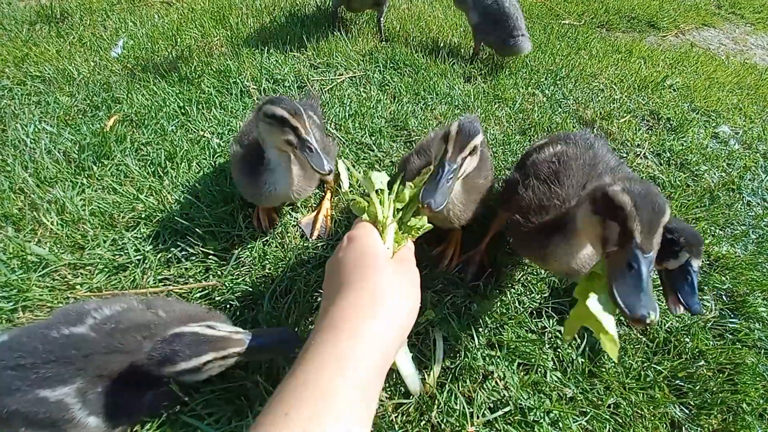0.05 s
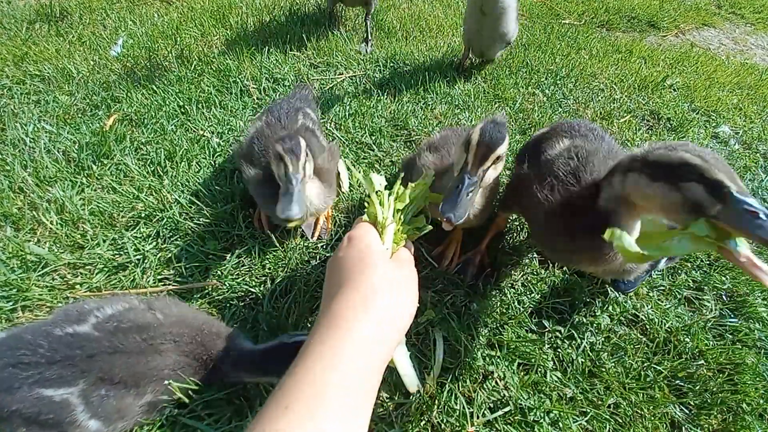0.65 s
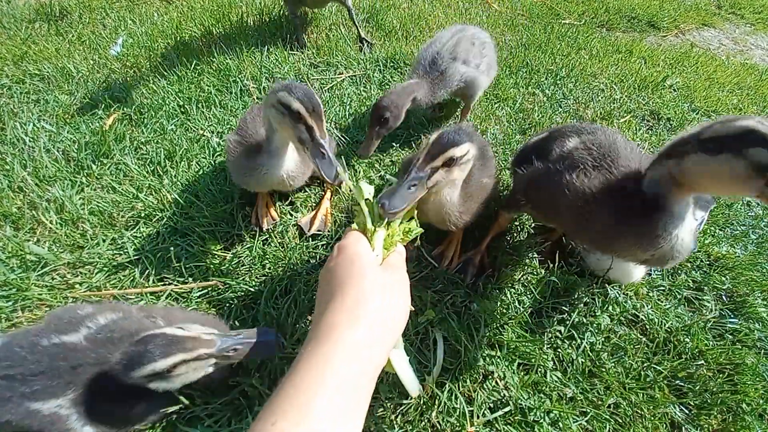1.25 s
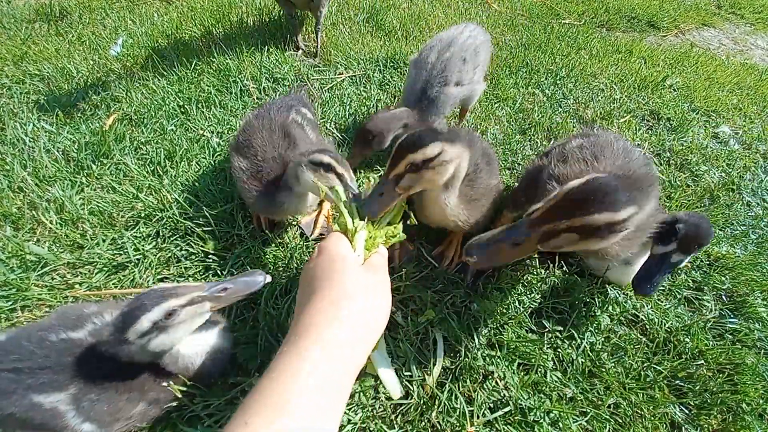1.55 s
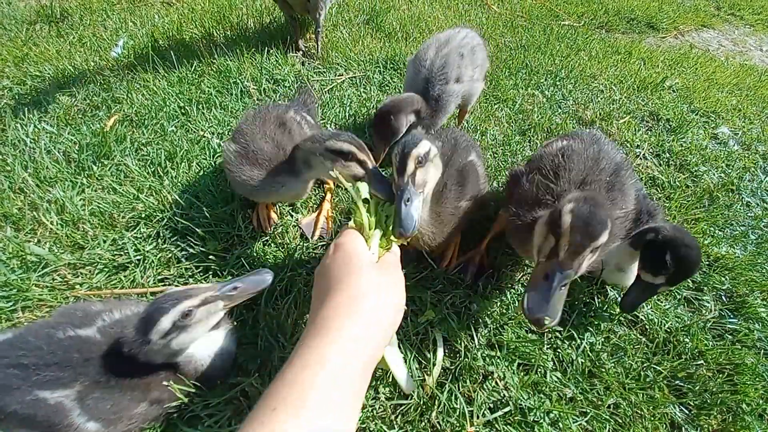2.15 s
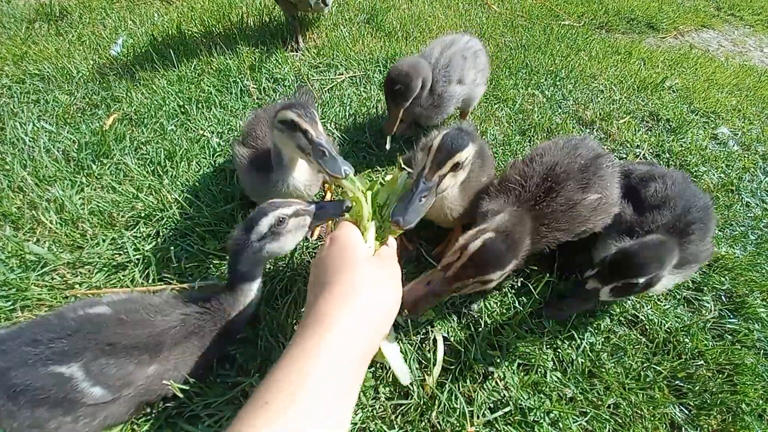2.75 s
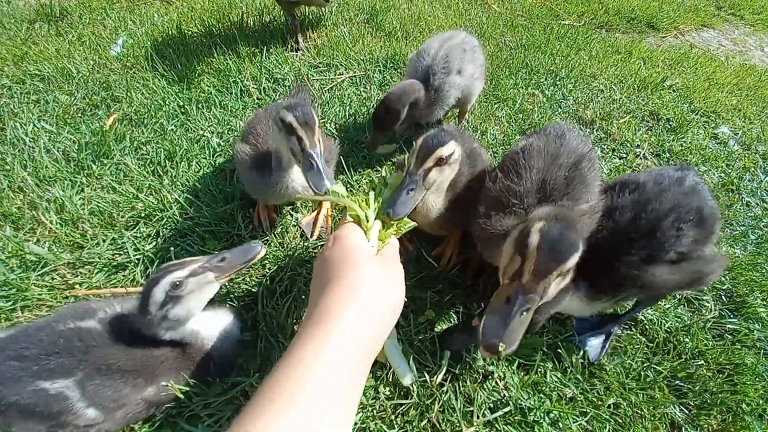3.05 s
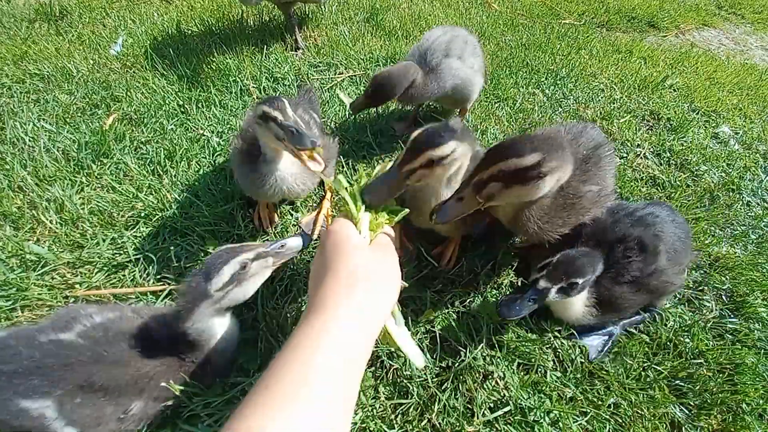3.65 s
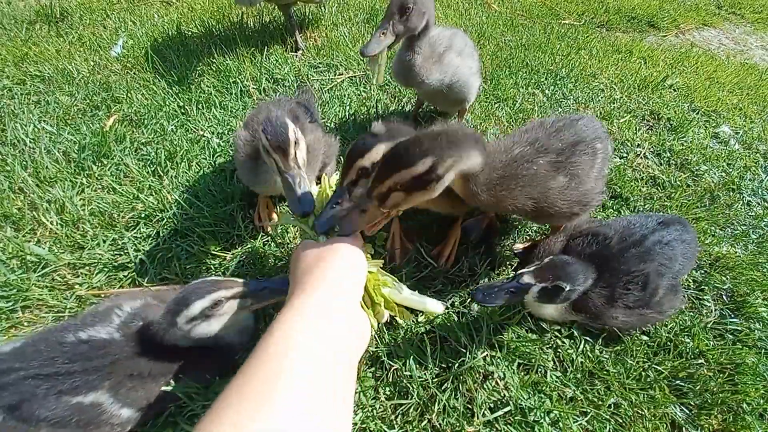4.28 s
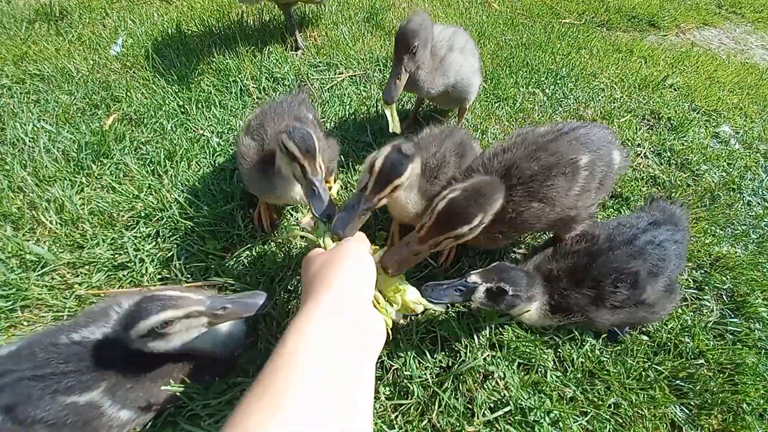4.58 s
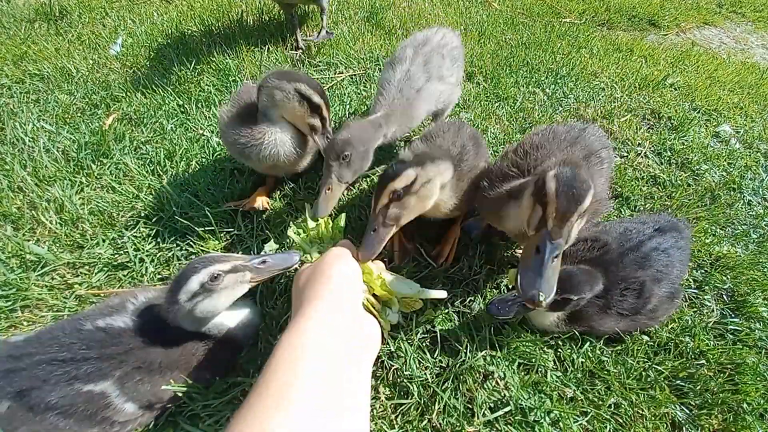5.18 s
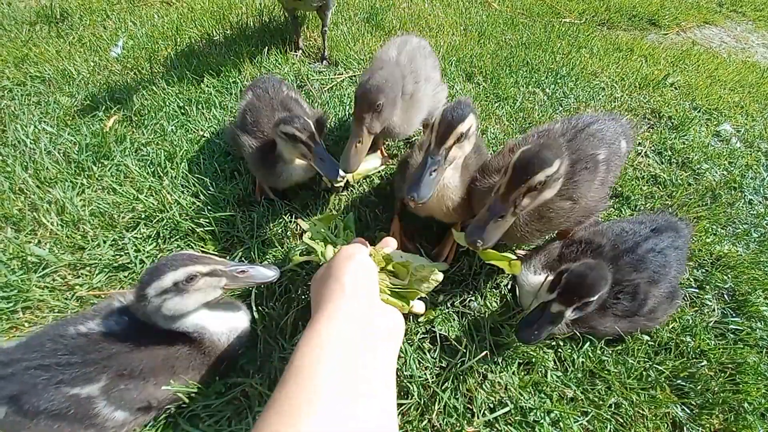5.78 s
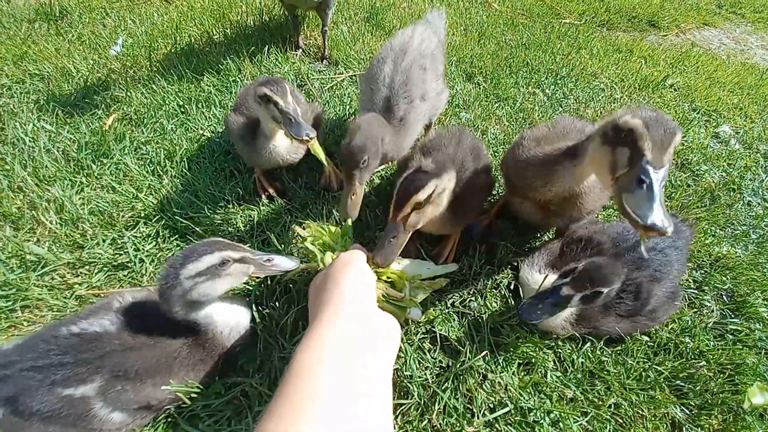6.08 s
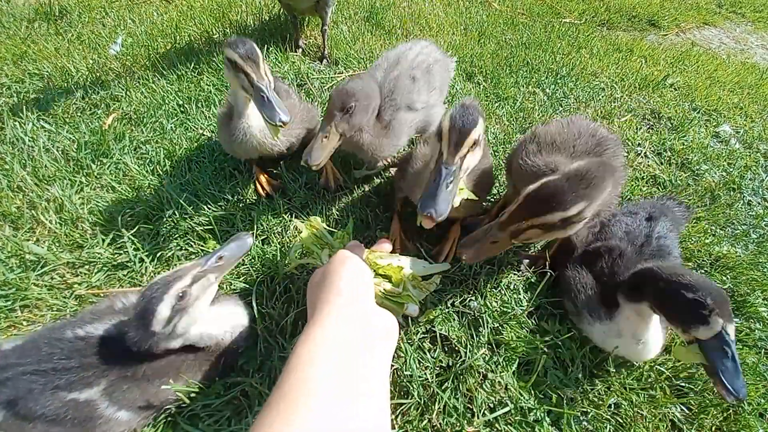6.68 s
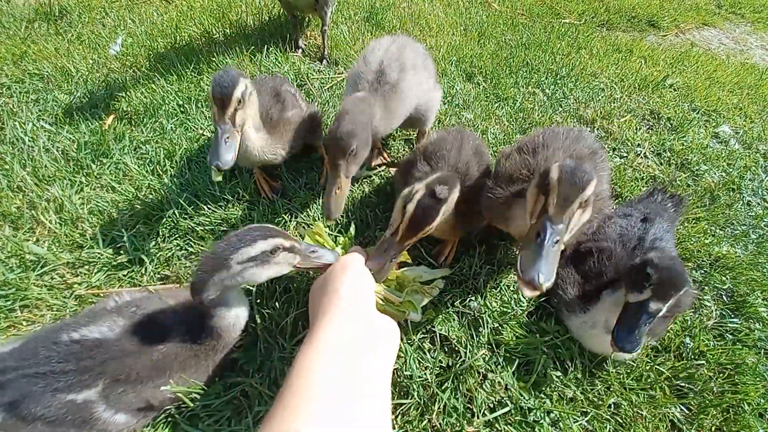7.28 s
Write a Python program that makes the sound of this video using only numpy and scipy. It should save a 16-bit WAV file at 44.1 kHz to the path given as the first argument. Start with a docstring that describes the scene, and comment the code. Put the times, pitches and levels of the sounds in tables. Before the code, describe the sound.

Young ducklings feed on lettuce on a lawn, close to the microphone. Soft grass rustle, crackling leaves and small bill snaps run throughout, with occasional faint, hoarse grunts. At about 0.3 to 0.5 seconds an older duckling gives low whistles that crack into short quacks. Smaller ducklings peep briefly from either side, clearest around 1.5 seconds, and two low whistles follow just after 2 seconds. From about 3.3 to 5.5 seconds a light breeze buffets the microphone with a low rumble, joined by a few soft thumps. Sharp pecks come near 3.9 and 4.7 seconds, and crisp leaf ribs crack between 4.5 and 6.3 seconds. The older duckling whistles and quacks again around 5.3 and 6.2 seconds, with a bright peep between. More peeps follow, and a quick cluster of bill snaps comes at about 7.4 seconds.

```python
"""Ducklings call over a handful of lettuce on a lawn: the small ones peep, and an older one, its voice
breaking, whistles low and cracks into quacks. Peeps and whistles are gliding tones of the syrinx;
quacks and soft grunts are pulses ringing in the throat. Bills snap, leaves crackle and tear, and
the grass rustles. A light breeze buffets the two microphone ports of a camera close by."""
import sys
import numpy as np
from scipy import signal
from scipy.fft import rfft, irfft, next_fast_len
from scipy.io import wavfile
from scipy.ndimage import uniform_filter1d, map_coordinates

SR = 44100
rng = np.random.default_rng(int(sys.argv[2]) if len(sys.argv) > 2 else 0)


def inscribe(sig):
    """Save sig as 16-bit PCM at rate SR to the path in sys.argv[1].

    A 1-D sig is mono; a 2-D sig holds one channel per row.
    Samples are clipped to [-1, 1] before scaling.
    """
    pcm = np.round(np.clip(np.atleast_2d(sig).T, -1, 1) * 32767)
    wavfile.write(sys.argv[1], SR, pcm.astype(np.int16))


N = 331975


def amp(db):
    return 10 ** (np.asarray(db) / 20)


def unit_rms(x):
    return x / np.sqrt(np.mean(x ** 2) + 1e-20)


def seconds(length_s):
    return np.arange(max(round(length_s * SR), 256)) / SR


def at_hz(points, hz):
    """Interpolate (hz, value) points on a log axis."""
    knots_hz, values = np.transpose(points)
    return np.interp(np.log(hz + 1), np.log(knots_hz + 1), values)


def at_time(points, t):
    """Interpolate (time_s, value) points."""
    return np.interp(t, *np.transpose(points))


def envelope(t, attack_s, release_s):
    """Swell, hold, fade."""
    swell = np.sin(np.pi / 2 * np.clip(t / attack_s, 0, 1))
    fade = np.sin(np.pi / 2 * np.clip((t[-1] - t) / release_s, 0, 1)) ** 2
    return swell * fade


def wobble(knots_per_s, n):
    """Smooth random curve of n samples."""
    knots = rng.standard_normal(int(n * knots_per_s / SR) + 4)
    return map_coordinates(knots, [np.arange(n) * knots_per_s / SR])


def filtered(x, response):
    """Apply a complex frequency response."""
    n = x.shape[-1]
    size = next_fast_len(n + 4096, True)
    return irfft(rfft(x, size) * response(np.fft.rfftfreq(size, 1 / SR)), size)[..., :n]


def coloured(x, spectrum):
    """Apply (hz, gain_db) points; rms 1."""
    return unit_rms(filtered(x, lambda hz: amp(at_hz(spectrum, hz))))


def ringing(gain_db, size=2048):
    """Minimum-phase impulse response of a gain curve; energy 1."""
    cepstrum = irfft(np.log(amp(gain_db(np.fft.rfftfreq(size, 1 / SR)))))
    cepstrum[1:size // 2] *= 2
    cepstrum[size // 2 + 1:] = 0
    impulse = irfft(np.exp(rfft(cepstrum)))
    return impulse / np.linalg.norm(impulse)


def ports(x, lead_ms, pan_db=0):
    """Mono to two ports; positive values make the left earlier and louder."""
    side = np.array([[.5], [-.5]])
    return amp(side * pan_db) * filtered(x, lambda hz: np.exp(2j * np.pi * hz * side * lead_ms / 1000))


def add(out, start_s, x):
    i = min(max(round(start_s * SR), 0), N)
    out[..., i:i + x.shape[-1]] += x[..., :N - i]


# Open-air spectrum: freq_hz, gain_db
AIR_SPECTRUM = [(18, -43.5), (30, -23), (355, 3), (780, -9), (1190, -1), (2230, -5.5), (12300, -9),
                (16000, -6.5)]


def open_air(level_db=-64):
    """Quiet, steady outdoor noise."""
    return amp(level_db) * coloured(rng.standard_normal((2, N)), AIR_SPECTRUM)


# Gust strength: time_s, relative_db
GUSTS = [(0.0, -49.5), (0.48, -58), (0.58, -35.5), (0.65, -56.5), (0.96, -87), (2.01, -82.5), (2.22, -63),
         (2.42, -63.5), (2.68, -77.5), (3.19, -79), (3.28, -53), (3.62, -47), (3.81, -57), (3.87, -43),
         (4.09, -53.5), (4.23, -47.5), (4.37, -57), (4.45, -42.5), (4.75, -38.5), (5.05, -41),
         (5.145, -42.5), (5.23, -41.5), (5.29, -50), (5.33, -38), (5.45, -38.5), (5.53, -58.5),
         (5.72, -50.5), (6.18, -59), (6.41, -72), (7.53, -54)]
# Single buffets: centre_s, eddy_db
BUFFETS = [(.065, -51), (.18, -65.5), (.25, -61.5), (3.384, -51), (3.461, -50), (3.55, -52), (3.71, -54.5),
           (3.911, -44.5), (4.185, -50.5), (4.251, -42), (4.295, -39.5), (4.42, -44.5), (4.48, -38.5),
           (4.531, -36.5), (4.595, -42), (4.66, -38), (4.757, -36.5), (4.846, -38.5), (4.915, -44),
           (5.057, -38), (5.224, -40.5), (5.461, -41.5)]
# Wind rumble spectrum: freq_hz, gain_db
RUMBLE_SPECTRUM = [(12, -57), (32, -13), (92, 7.5), (189, -5), (300, -28), (660, -100)]
# Eddy spectrum: freq_hz, gain_db
EDDY_SPECTRUM = [(90, -40), (170, -2.5), (300, 3), (500, -2.5), (800, -21), (1400, -43), (2500, -48)]


def breeze(buffet_s=.044, push_db=5, eddy_db=-9, lumpy_db=3.5, shared=.42):
    """Gusts hit each port mostly on its own; each buffet lifts the rumble and sheds finer eddies."""
    def flow(spectrum, depth_db):
        noise = rng.standard_normal((2, N)) + shared * rng.standard_normal(N)
        return coloured(noise * amp(depth_db * wobble(45, N)), spectrum)

    gust_db = at_time(GUSTS, np.arange(N) / SR)
    push, puffs = np.zeros(N), np.zeros(N)
    shape = np.hanning(round(buffet_s * SR))
    for centre_s, puff_db in BUFFETS:
        add(push, centre_s - buffet_s / 2, shape)
        add(puffs, centre_s - buffet_s / 2, amp(puff_db) * shape)
    right_bias = amp([[-2.5], [2.5]])
    rumble = amp(gust_db + push_db * push) * flow(RUMBLE_SPECTRUM, lumpy_db) * right_bias
    eddies = amp(gust_db + eddy_db) * flow(EDDY_SPECTRUM, lumpy_db)
    return rumble + eddies + puffs * flow(EDDY_SPECTRUM, 0)


# Low thumps and one peep's hum: centre_s, pitch_hz, width_s, level_db
THUMPS_AND_HUM = [(0.591, 136.4, 0.0019, -27), (3.865, 84.5, 0.0068, -36.5), (3.923, 98, 0.0041, -29),
                  (4.702, 194, 0.0017, -24), (4.767, 96.5, 0.0096, -25), (6.274, 388, 0.0027, -32),
                  (7.37, 365, 0.0014, -39.5), (7.447, 137, 0.0018, -38)]


def thumps_and_hum():
    """Short low thumps, plus the brief low hum of a duckling's fluttering peep at 6.27 s."""
    out, t = np.zeros(N), np.arange(-SR // 20, SR // 20) / SR
    for centre_s, pitch_hz, width_s, level_db in THUMPS_AND_HUM:
        swell = amp(level_db) * np.exp(-(t / width_s) ** 2 / 2)
        add(out, centre_s + t[0], -swell * np.cos(2 * np.pi * pitch_hz * t))
    return ports(out, lead_ms=.053, pan_db=-7.5)


def ticks(per_s, hiss, scattered):
    """Tiny ticks on soft hiss, part direct, part scattered by the grass; rms 1."""
    sparse = unit_rms((rng.random((3, N)) < per_s / SR) * rng.uniform(-.91, 1, (3, N)))
    direct, *diffuse = sparse + hiss * rng.standard_normal((3, N))
    return unit_rms(ports(direct, lead_ms=.16) + scattered * np.array(diffuse))


def blade_colours(x, depth_db):
    """Each grass blade has its own colour: brief, narrow patches of random gain."""
    spectra = signal.stft(x, nperseg=128)[2]
    patch = np.outer(np.hanning(7), np.hanning(9))
    field = signal.fftconvolve(rng.standard_normal(spectra.shape[1:]), patch, "same")
    gain = unit_rms(amp(depth_db * unit_rms(field)))
    return signal.istft(spectra * gain, nperseg=128)[1][:, :N]


# Flock shuffling in the grass: time_s, relative_db
SHUFFLE = [(0.0, -60.5), (0.46, -56.5), (1.32, -63), (1.61, -58), (1.74, -64), (2.55, -64), (2.66, -69),
           (2.8, -63.5), (3.5, -57), (4.03, -65), (4.3, -59), (4.7, -55.5), (4.86, -66.5), (5.49, -64),
           (5.62, -58), (6.25, -54), (6.65, -61), (7.21, -59.5), (7.53, -55.5)]
# Tugs that tear a leaf: peak_s, length_s, relative_db
TUGS = [(0.557, 0.0323, -51.5), (0.634, 0.12, -53), (1.031, 0.09, -55.5), (1.463, 0.068, -52.5),
        (1.651, 0.031, -46), (2.162, 0.057, -51.5), (2.448, 0.066, -53), (2.577, 0.12, -56.5),
        (3.879, 0.13, -54.5), (4.489, 0.03, -47), (4.539, 0.027, -47.5), (4.592, 0.039, -49.5),
        (5.247, 0.21, -54), (5.586, .04, -51), (5.75, 0.072, -45.5), (6.239, 0.0326, -46),
        (7.388, 0.09, -49.5)]
# Rustle spectrum: freq_hz, gain_db
RUSTLE_SPECTRUM = [(290, -31.5), (500, -8.5), (784, -11.5), (1300, -4.5), (2600, -4), (4800, -1),
                   (8500, -4), (12000, -3), (16000, -6.5)]


def rustle(shuffle_gain_db=1, tug_gain_db=2, nibbles_per_s=35, nibble_db=2.5, rise_share=.58):
    """Bills and feet stir the grass; each tug on a leaf adds a coarser crackle."""
    shuffle_db = at_time(SHUFFLE, np.arange(N) / SR) + shuffle_gain_db
    stir = amp(shuffle_db + nibble_db * wobble(nibbles_per_s, N))
    tugging = np.zeros(N)
    for peak_s, length_s, relative_db in TUGS:
        rise_s = rise_share * length_s
        pull = envelope(seconds(length_s), rise_s, length_s - rise_s)
        add(tugging, peak_s - rise_s, amp(relative_db + tug_gain_db) * pull)
    grass = stir * ticks(per_s=500, hiss=.45, scattered=1.76)
    leaves = tugging * ticks(per_s=380, hiss=.46, scattered=.99)
    crackle = blade_colours(grass + leaves, depth_db=3)
    body = ringing(lambda hz: at_hz(RUSTLE_SPECTRUM, hz))
    return signal.oaconvolve(crackle, body[None], axes=1)[:, :N]


# Leaf rib breaks: start_s, relative_db
RIB_BREAKS = [(4.508, -28), (4.7251, -21.5), (5.2105, -18.5), (6.031, -29.5), (6.223, -26.5),
              (6.306, -17.5)]
# Rib crack spectrum: freq_hz, gain_db
RIB_SPECTRUM = [(1500, -14.5), (6000, -4.5), (9000, -16.5), (12700, 0.5), (16000, -8)]


def rib_breaks(decay_s=.00033):
    """A crisp leaf rib breaks in one short, bright crack."""
    out, t = np.zeros(N), np.arange(SR // 200) / SR
    body = ringing(lambda hz: at_hz(RIB_SPECTRUM, hz))
    for start_s, relative_db in RIB_BREAKS:
        crack = rng.standard_normal(len(t)) * np.exp(-t / decay_s)
        add(out, start_s, amp(relative_db) * signal.fftconvolve(crack / np.abs(crack).max(), body))
    return ports(out, lead_ms=.13)


# Hard pecks: start_s, peak_db
PECKS = [(3.909, -23), (4.725, -21.5), (7.4067, -19.5), (7.4729, -33.5)]
# Modes of the hollow bill: freq_hz, relative_db, t60_s
BILL_MODES = [(1470, 13.5, 0.0077), (2694, 28.5, 0.0027)]


def pecks():
    """The bill claps shut and rings for a few milliseconds."""
    out, t = np.zeros(N), np.arange(SR // 40) / SR
    for start_s, peak_db in PECKS:
        ring = sum(amp(db - 60 * t / t60_s) * np.sin(2 * np.pi * hz * t) for hz, db, t60_s in BILL_MODES)
        add(out, start_s, amp(peak_db) * ring / np.abs(ring).max())
    return ports(out, lead_ms=.12)


# Bill snaps: break_s, relative_db, ring_hz, top_octave_db
BITES = [(0.67, -31, 12400, -4.5), (1.091, -30.5, 4400, 2), (1.655, -25.5, 4810, -10.5),
         (2.1587, -32, 4220, -13), (2.234, -36.5, 4600, -0.5), (2.4054, -30.5, 3930, -10),
         (2.4567, -37.5, 5200, 2), (2.902, -30.5, 4300, 2), (3.034, -32.5, 5540, 6.5),
         (3.1351, -33, 5600, 6.5), (3.424, -30, 6340, 3), (3.5638, -23.5, 4580, -1),
         (3.8531, -32.5, 4400, -15.5), (3.911, -27.5, 4600, -12.5), (4.508, -27, 4000, 3),
         (4.5212, -37, 3700, -0.5), (4.7187, -25, 4000, 5), (5.569, -32.5, 4300, 1),
         (5.7517, -31.5, 4360, -5.5), (5.763, -27, 4400, 2.5), (6.2234, -24.5, 5740, -6),
         (6.306, -24, 12100, -9), (6.6352, -33.5, 11700, -14), (6.8499, -28.5, 7100, 2),
         (6.9141, -29, 11600, -4), (7.3826, -27, 4600, 1), (7.405, -29, 6060, -8.5),
         (7.418, -27.5, 4800, -4), (7.4758, -31.5, 3680, -5), (7.484, -33, 3660, 1)]
# Snapping leaf spectrum: freq_hz, gain_db
BITE_SPECTRUM = [(590, -5), (1900, 1), (3500, -2), (12500, 1.5), (16000, -4)]


def bites(rise_s=.0038, decay_s=.0042, crack_s=.0006, ring_db=12.5, ring_width_hz=930, gain_db=-6):
    """Leaf fibres crackle round one sharp break that rings in the bill; light nips sound thinner."""
    out, t = np.zeros((2, N)), np.arange(-SR // 50, SR // 25) / SR
    for break_s, relative_db, ring_hz, top_octave_db in BITES:
        def colour_db(hz):
            thin_db = .41 * min(relative_db + 26, 0) * at_hz([(2000, 1), (4500, 0)], hz)
            crisp_db = top_octave_db * at_hz([(6500, 0), (10500, 1)], hz)
            bill_db = ring_db / (1 + ((hz - ring_hz) / ring_width_hz) ** 2)
            return at_hz(BITE_SPECTRUM, hz) + thin_db + crisp_db + bill_db

        fibres = unit_rms(rng.standard_normal(len(t)) * amp(5 * wobble(2544, len(t))))
        crackle = amp(-7) * fibres * np.exp(-np.maximum(-t / rise_s, t / decay_s))
        crack = .8 * unit_rms(rng.standard_normal(len(t))) * np.exp(-np.abs(t) / crack_s)
        bite = amp(relative_db + gain_db) * signal.fftconvolve(crackle + crack, ringing(colour_db))
        add(out, break_s + t[0], ports(bite, lead_ms=rng.normal(.13, .055), pan_db=rng.normal(0, 2.2)))
    return out


def buzz(pulse_hz, tract, jitter, rasp, crossover_hz=1700):
    """Soft, uneven pulses ring in the throat; the puff of air with each gives the treble."""
    def voiced(hz):
        return 1 / np.hypot(1, (hz / crossover_hz) ** 4)

    n = len(pulse_hz)
    cycles = np.cumsum(pulse_hz * (1 + jitter * wobble(250, n))) / SR
    onsets = np.diff(np.floor(cycles), prepend=-1) > 0
    pulses = onsets * np.sqrt(SR / pulse_hz) * amp(2.8 * rng.standard_normal(n))
    puffs = unit_rms(rng.standard_normal(n) * np.exp(-(cycles % 1)))
    source = filtered(pulses, voiced) + filtered(puffs, lambda hz: np.hypot(rasp, 1 - voiced(hz)))
    return signal.fftconvolve(source, tract)[:n] / np.hypot(1, rasp)


# Soft grunts: centre_s, length_s, pulse_hz, level_db
GRUNTS = [(0.312, 0.16, 250, -46), (1.698, .2, 225, -44.5), (3.492, 0.22, 236, -51.5),
          (4.358, 0.25, 200, -47), (5.038, .24, 230, -42.5), (5.966, 0.067, 240, -45),
          (6.591, 0.21, 237, -43.5)]
# Grunting throat response: freq_hz, gain_db
GRUNT_SPECTRUM = [(150, -37.5), (260, -1.5), (502, -2.5), (824, -7.5), (945, -1.5), (1080, -8), (1370, -5),
                  (2510, -22), (4000, -29.5), (8800, -80)]


def grunts(swell_db=30.5):
    """Low, hoarse throat pulses that swell and fade."""
    out, tract = np.zeros(N), ringing(lambda hz: at_hz(GRUNT_SPECTRUM, hz))
    for centre_s, length_s, pulse_hz, level_db in GRUNTS:
        n = round(length_s * SR)
        swell = amp(level_db - swell_db * np.abs(np.linspace(-1, 1, n)) ** 1.18)
        voice = buzz(np.full(n, pulse_hz), tract, jitter=.06, rasp=1)
        add(out, centre_s - length_s / 2, swell * voice)
    return ports(out, lead_ms=-.22)


# Older duckling's throat response: freq_hz, gain_db
THROAT_SPECTRUM = [(120, -26.5), (270, -14), (480, -20), (780, -12), (950, -6), (1170, 4), (1400, -12.5),
                   (1700, -11), (2100, -22.5), (2900, -30), (4200, -39), (6000, -43), (9000, -73.5)]


def throat(open_db, rise_per_db=.01):
    """An open bill raises the main resonance and lets out more on both sides of it."""
    lift = 1 + rise_per_db * open_db
    opening = [(250, 1.8), (800, .26), (2800, .76), (4000, 1.57)]  # freq_hz, weight
    return ringing(lambda hz: at_hz(THROAT_SPECTRUM, hz / lift) + open_db * at_hz(opening, hz))


# Older duckling's head position: time_s, left_lead_ms
HEAD_POSITION = [(.4, 0.12), (2.15, 0.21), (5.3, 0.19), (6.3, 0.21)]


def from_head(call, start_s, pan_db=0):
    """The older duckling's head position sets the delay between the ports."""
    return ports(call, at_time(HEAD_POSITION, start_s), pan_db)


# Older duckling's quacks: start_s, length_s, first_pulse_hz, level_db, open_db
QUACKS = [(.312, 0.094, 300, -33.5, -8.5), (0.345, 0.056, 292, -21.5, 1), (0.462, .075, 302, -22, 0.5),
          (5.37, 0.062, 345, -23.5, 6), (6.298, 0.069, 348, -22, 6)]


def quacks(attack_s=.021, release_s=.028, slowing_hz_per_s=2900, fade_db_per_s=130):
    """The breaking voice cracks into pulses that slow and weaken as the air runs out."""
    out = np.zeros((2, N))
    for start_s, length_s, first_pulse_hz, level_db, open_db in QUACKS:
        t = seconds(length_s)
        pulse_hz = np.maximum(first_pulse_hz - slowing_hz_per_s * t, 100)
        level = amp(level_db - fade_db_per_s * t) * envelope(t, attack_s, release_s) ** 2
        voice = buzz(pulse_hz, throat(open_db), jitter=.05, rasp=.36)
        add(out, start_s, from_head(level * voice, start_s))
    return out


def syrinx(pitch_hz, overtones_db=(), jitter=0):
    """Nearly pure tone whose pitch glides and trembles."""
    glide_hz = uniform_filter1d(pitch_hz, size=200) * (1 + jitter * wobble(401, len(pitch_hz)))
    phase = 2 * np.pi * np.cumsum(glide_hz) / SR
    tone = np.sin(phase) + sum(amp(db) * np.sin(k * phase) for k, db in enumerate(overtones_db, 2))
    return np.sqrt(2) * tone * signal.windows.tukey(len(pitch_hz), .08)


def syrinx_flutter(pitch_hz, flutter_hz=250, upper_db=-5, lower_db=-14, hum_db=-17):
    """Flutter adds a low hum and two side tones; the throat favours the upper."""
    rate_hz = flutter_hz * (1 + .16 * wobble(225, len(pitch_hz)))
    partials = [(pitch_hz + rate_hz, upper_db), (pitch_hz - rate_hz, lower_db), (rate_hz, hum_db)]
    return sum(amp(db) * syrinx(hz) for hz, db in partials)


def pitch_arch(t, top_s, start_hz, top_hz, settled_hz, settle_s=.024, sag_hz_per_s=800):
    """The pitch climbs, drops back from its top, then keeps sagging."""
    rising_hz = start_hz + (top_hz - start_hz) * np.sin(np.pi / 2 * t / top_s)
    falling_hz = settled_hz + (top_hz - settled_hz) * np.exp(-((t - top_s) / settle_s) ** 2)
    return np.where(t < top_s, rising_hz, falling_hz - sag_hz_per_s * (t - top_s))


# Older duckling's whistles: start_s, length_s, to_top_s, to_clear_s, start_hz, top_hz, settled_hz,
# flutter_db, clear_db, slump_db, open_db
WHISTLES = [ (0.313, 0.069, 0.032, 0.035, 871, 1131, 774, -36, -30, -1, 9),
            (0.437, 0.078, 0.027, 0.0051, 651, 924, 687, -57, -31, 4, -15),
            (2.062, 0.078, .028, 0.035, 692, 1143, 697, -42, -31.5, 1, 8),
            (2.179, 0.088, 0.033, 0.032, 650, 960, 710, -51.5, -34.5, 3.5, 4),
            (5.155, 0.099, 0.036, 0.067, 930, 1416, 794, -50, -58, 0, 0),
            (5.248, 0.147, 0.013, 0.037, 800, 1303, 1005, -53.5, -28, 18, 17.5),
            (6.077, 0.1, 0.047, 0.068, 937, 1180, 816, -48.5, -43.5, -3, 7),
            (6.164, 0.16, 0.029, 0.048, 886, 1155, 1060, -43.5, -27.5, 5, 14.5)]
# Overtones let out by an open bill: freq_hz, gain_db
OVERTONE_SPECTRUM = [(1500, -18), (2050, -11), (2900, -29), (3700, -28.5), (4100, -22.5), (4400, -28),
                     (4700, -28), (5100, -49)]


def whistles(lock_s=.028, wide_open_db=13.5, muffled_db=-8, shimmer_db=3, hiss_db=-17):
    """One side of the syrinx whistles; the other flutters against it until the note locks in clear."""
    out = np.zeros((2, N))
    for row in WHISTLES:
        start_s, length_s, to_top_s, to_clear_s, *arch_hz, flutter_db, clear_db, slump_db, open_db = row
        t = seconds(length_s)
        n = len(t)
        pitch_hz = pitch_arch(t, to_top_s, *arch_hz)
        clear = np.clip((t - to_clear_s) / lock_s + .5, 0, 1)
        overtones_db = []
        for k in range(2, 6):
            bill_db = at_hz(OVERTONE_SPECTRUM, k * pitch_hz) + (k > 3) * (open_db - wide_open_db)
            overtones_db.append(bill_db + muffled_db * (1 - clear) + shimmer_db * wobble(506, n))
        tone = syrinx(pitch_hz, overtones_db, jitter=.018) * (1 + .14 * wobble(700, n))
        flutter = (1 - clear) * syrinx_flutter(pitch_hz)
        hiss = amp(hiss_db) * signal.fftconvolve(rng.standard_normal(n), throat(open_db / 2))[:n]
        slump = np.sin(np.pi * np.clip((t - to_clear_s) / (length_s - to_clear_s), 0, 1)) ** 2
        level = amp(flutter_db + (clear_db - flutter_db) * clear - slump_db * slump)
        note = (tone + flutter + hiss) * envelope(t, attack_s=.0087, release_s=.028)
        add(out, start_s, from_head(level * note, start_s, pan_db=1.5))
    return out


# Small ducklings' peeps: peak_s, length_s, start_hz, middle_hz, end_hz, level_db, rasp, left_lead_ms
PEEPS = [ (0.012, 0.038, 1535, 1650, 1310, -45, 0.2, 0.26), (0.891, 0.048, 1490, 1640, 1580, -59, .3, 0.18),
         (1.009, 0.055, 1590, 1920, 1560, -44.5, 0, 0.15),
         (1.456, .024, 1850, 2530, 2420, -40, 0.14, -0.097),
         (1.47, 0.039, 2673, 2344, 2230, -33, 0.07, -0.082),
         (1.604, 0.051, 2060, 2184, 2260, -44, 0.1, -0.12),
         (1.62, 0.034, 2120, 2390, 1940, -30, 0.07, -0.15),
         (2.593, 0.058, 1940, 2290, 2020, -39, 0.07, -0.16),
         (2.752, 0.053, 1450, 1544, 1464, -57, 0.23, 0.25),
         (3.75, 0.045, 1510, 1835, 1345, -43.5, 0.16, 0.19),
         (5.074, 0.056, 1395, 2360, 1430, -36.5, 0.2, 0.19),
         (5.628, 0.049, 1530, 1937, 1900, -45, 0.1, -0.18),
         (5.73, 0.079, 2360, 2540, 2630, -44.5, 0.14, -0.042),
         (5.835, .048, 2180, 2510, 1910, -27, 0, -0.092),
         (6.288, 0.059, 1976, 2830, 2830, -38.5, 0.6, 0.08),
         (6.395, 0.055, 2200, 2080, 1970, -35.5, 0.13, -0.18),
         (6.989, 0.049, 1380, 2346, 1770, -42.5, 0.13, -0.17),
         (7.088, 0.047, 2960, 2386, 2240, -41.5, 0.23, -0.096),
         (7.117, 0.041, 2210, 2180, 1860, -37, 0.08, -0.2),
         (7.52, 0.053, 1500, 1730, 1613, -43, 0.03, 0.23)]


def peeps(rise_share=.53, swell_db=19.5, flutter_hz=390, lock_s=.014, hoarse=.069):
    """Short gliding whistles from either side; most flutter before the note takes hold."""
    out = np.zeros((2, N))
    for peak_s, length_s, *contour_hz, level_db, rasp, left_lead_ms in PEEPS:
        rise_s = rise_share * length_s
        t = seconds(length_s) - rise_s
        knots_s = [-rise_s, 0, length_s - rise_s]
        pitch_hz = np.polyval(np.polyfit(knots_s, contour_hz, 2), t)
        swell = amp(level_db - swell_db * np.interp(t, knots_s, [-1, 0, 1]) ** 2)
        depth = 2.4 * rasp * np.clip(-t / lock_s, 0, 1)
        flutter = depth * (np.cos(2 * np.pi * flutter_hz * t) + wobble(1495, len(t)))
        roughness = 1 + flutter + hoarse * wobble(903, len(t))
        tone = swell * roughness * syrinx(pitch_hz, overtones_db=[-35, -38], jitter=.015)
        add(out, peak_s - rise_s, ports(tone[peak_s + t >= 0], left_lead_ms))
    return out


def ground_scatter(x, level_db=-22, t60_s=.12, build_s=.004):
    """Faint, short reflections from the ground and surroundings."""
    t = np.arange(SR // 3) / SR
    tail = rng.standard_normal((2, len(t))) * amp(-60 * t / t60_s) * (1 - np.exp(-t / build_s))
    return amp(level_db) * signal.fftconvolve(x, tail / np.linalg.norm(tail[0]), axes=1)[:, :N]


def scene():
    """Birds and leaves close by, wind on the ports, open air behind."""
    birds = peeps() + whistles() + quacks() + grunts() + bites() + rib_breaks() + pecks()
    air = open_air()
    return birds + ground_scatter(birds) + rustle() + breeze() + thumps_and_hum() + air


def record(dry, limit_hz=16100):
    """The camera keeps nothing above its band limit."""
    return filtered(dry, lambda hz: hz < limit_hz)


dry = scene()
out = record(dry)
inscribe(out)
```